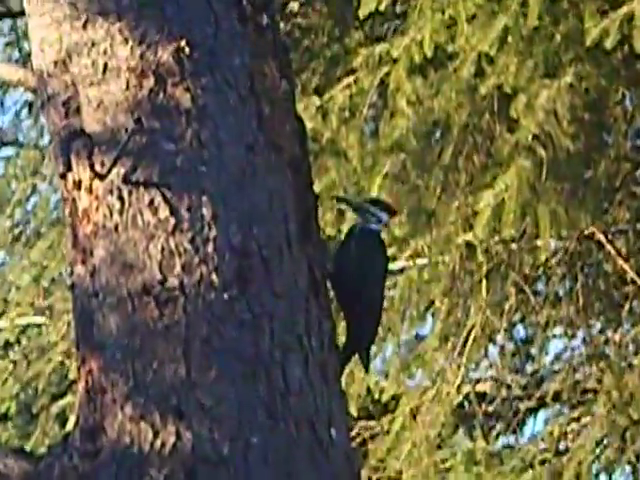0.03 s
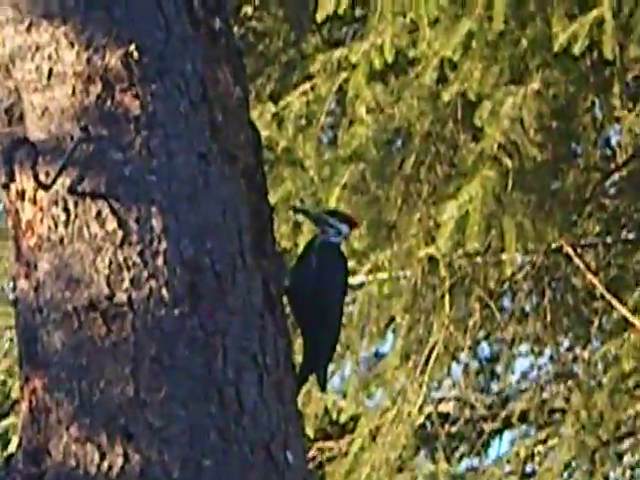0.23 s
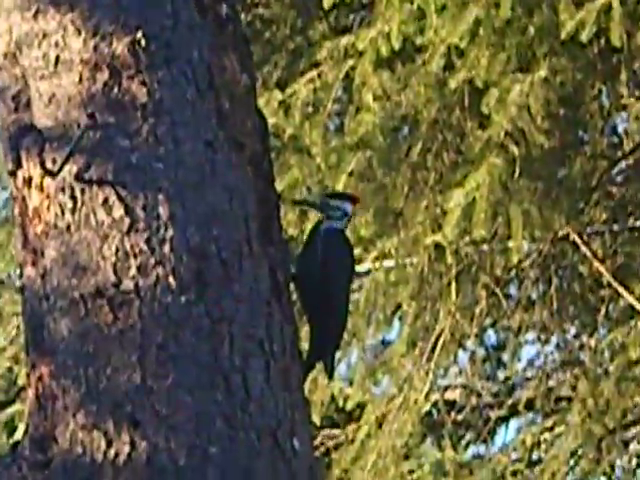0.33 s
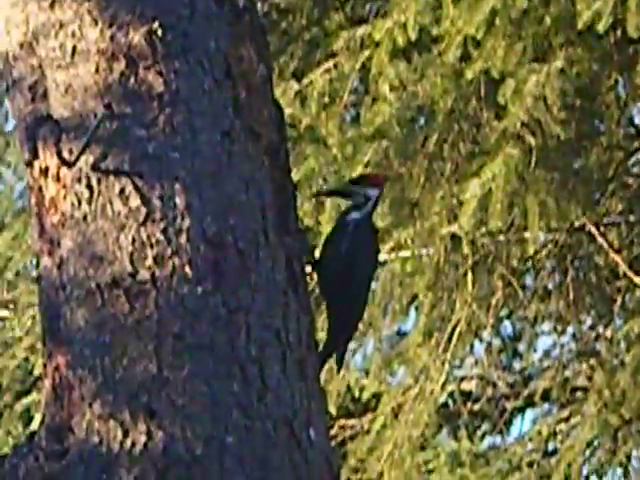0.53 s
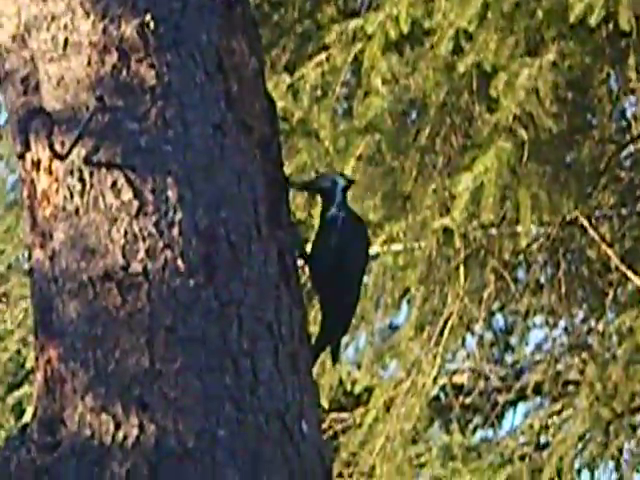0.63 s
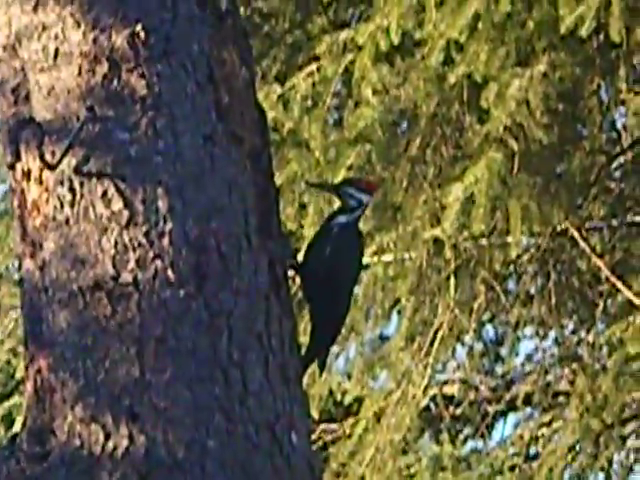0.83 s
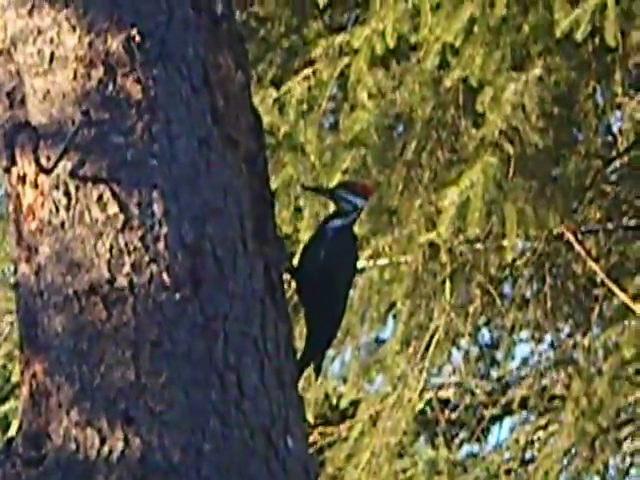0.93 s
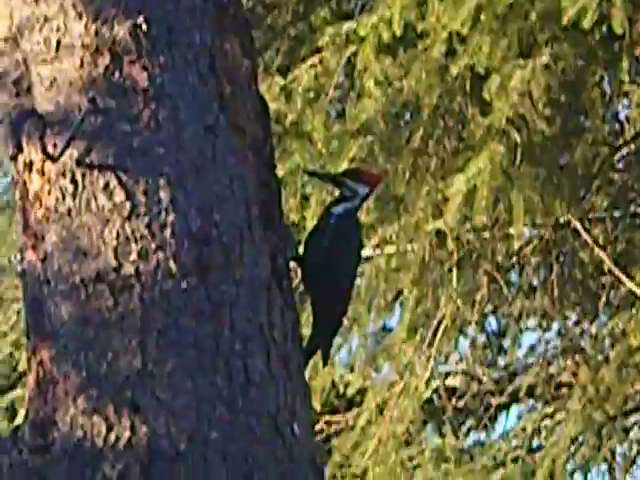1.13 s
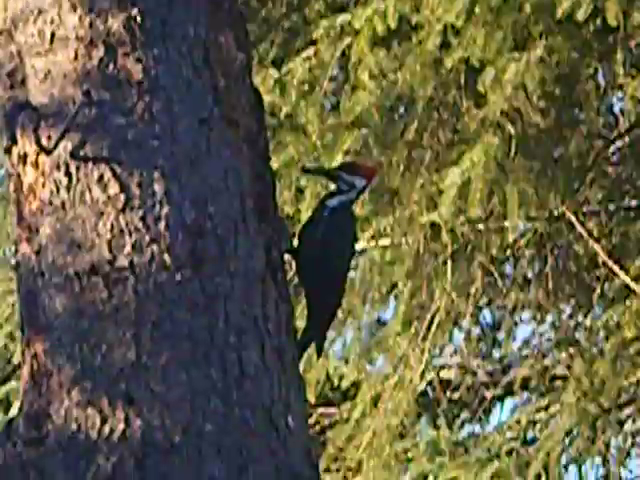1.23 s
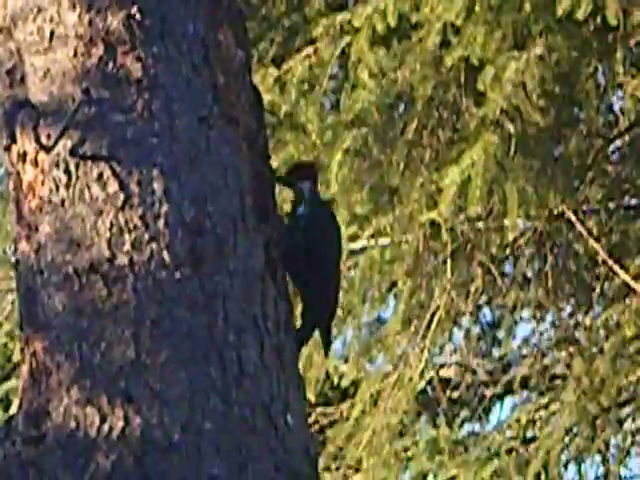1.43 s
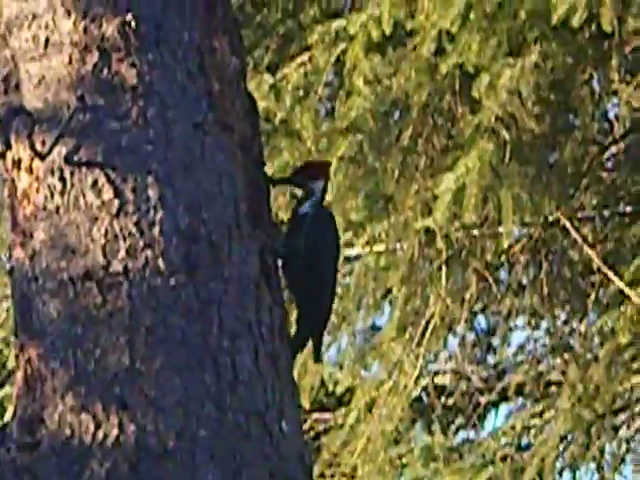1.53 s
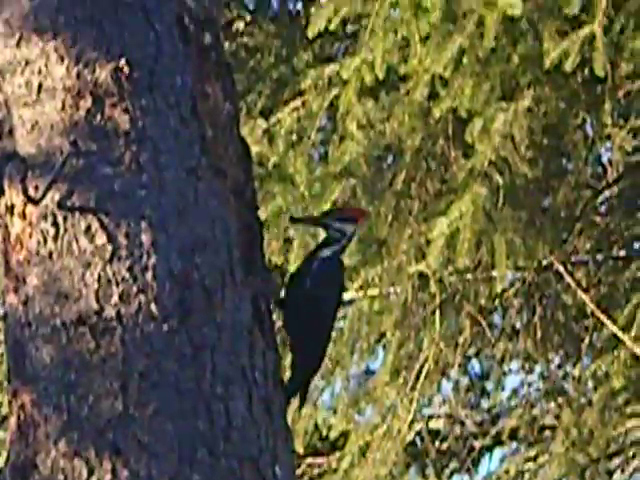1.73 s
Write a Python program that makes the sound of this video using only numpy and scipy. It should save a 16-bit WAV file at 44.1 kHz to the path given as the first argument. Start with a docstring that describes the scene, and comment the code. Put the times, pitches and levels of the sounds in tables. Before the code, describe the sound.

A woodpecker knocks once on a tree trunk over steady woodland hiss.

```python
"""A woodpecker's single knock

The woods hiss steadily and a distant engine drones at its firing rate, at first with a faint falling
whine, later with two fainter high tones. A woodpecker strikes a conifer trunk once: heavily damped
modes give a dry, dead knock that scatters briefly off nearby trees and just overloads the microphone.
Later its claws scratch faintly on the bark."""
import sys
import numpy as np
from scipy import signal
from scipy.fft import rfft, irfft, next_fast_len
from scipy.io import wavfile
from scipy.ndimage import map_coordinates

SR = 44100
rng = np.random.default_rng(int(sys.argv[2]) if len(sys.argv) > 2 else 0)


def transcribe(u):
    """Save the signal u as a 16-bit wav file named by the first command-line argument.

    u: samples, shape (n,) or (channels, n), limited to [-1, 1]; the rate is SR.
    q: integer samples, one column per channel.
    """
    v = np.clip(np.atleast_2d(u).T, -1, 1)
    q = np.round(v * 32767).astype(np.int16)
    wavfile.write(sys.argv[1], SR, q)


N = 79380


def amp(db):
    """Decibels to amplitude ratio."""
    return 10 ** (np.asarray(db) / 20)


def unit(x):
    """Normalisation to rms 1."""
    return x / np.sqrt(np.mean(x ** 2) + 1e-20)


def curves(rows):
    """Linear interpolation: one value per sample for each column after the time."""
    times, *columns = np.transpose(rows)
    return [np.interp(np.arange(N) / SR, times, column) for column in columns]


def since(onset):
    """Seconds since an onset, zero before it."""
    return np.maximum(np.arange(N) / SR - onset, 0)


def wobble(rate):
    """Smooth random modulation: a spline through `rate` knots a second."""
    return map_coordinates(rng.standard_normal(64), [np.arange(N) * rate / SR], mode="mirror")


def filtered(x, response):
    """Linear filtering: the spectrum of x times a frequency response."""
    size = next_fast_len(N + SR // 2)
    return irfft(rfft(x, size) * response(np.fft.rfftfreq(size, 1 / SR)), size)[:N]


def noise(spectrum):
    """Spectral shaping: noise of rms 1, coloured by (Hz, dB) points on a log frequency axis."""
    points_hz, db = np.transpose(spectrum)
    colour = lambda hz: amp(np.interp(np.log(hz + 1), np.log(points_hz), db))
    return unit(filtered(rng.standard_normal(N), colour))


def decay(t, t60):
    """Exponential damping: 60 dB in t60 seconds."""
    return np.exp(-np.log(1000) * t / t60)


# spectra of the hiss and the rumble (frequency [Hz], relative density [dB])
HISS_SPECTRUM = [(200, -6.5), (300, -1.5), (450, -3), (850, -2.5), (1200, -6.5), (1650, -8), (1830, -7.5),
                 (2000, -7.5), (2330, -8), (2550, -11), (3500, -12), (4100, -11), (5300, -14.5),
                 (6300, -10)]
RUMBLE_SPECTRUM = [(20, -8), (60, 0), (120, 9), (200, 4), (350, -16), (900, -59.5)]
# envelope of the hiss (time [s], level [dB])
HISS_ENVELOPE = [(0, -48.5), (.15, -48.5), (.28, -51), (.5, -51), (.68, -49.5), (1.0, -48.6), (1.2, -48),
                 (1.45, -49), (1.65, -48), (1.8, -48.5)]

def woods(low_hz=200, edge_hz=5410, flutter_db=1.0, flutter_rate=5.4, rumble_db=-60):
    """Band-limited noise: the woods hiss with slow amplitude modulation, over a faint rumble."""
    level_db, = curves(HISS_ENVELOPE)
    high_pass = lambda hz: hz ** 2 / np.sqrt(hz ** 4 + low_hz ** 4)
    band = lambda hz: high_pass(hz) / np.sqrt(1 + (hz / edge_hz) ** 64)
    hiss = unit(filtered(noise(HISS_SPECTRUM), band))
    hiss *= amp(level_db + flutter_db * wobble(flutter_rate))
    return hiss + amp(rumble_db) * noise(RUMBLE_SPECTRUM)


# engine's fundamental (time [s], firing rate [Hz], level [dB])
FIRING_TONE = [(0, 107.9, -54), (.07, 109.3, -42.5), (.15, 107.1, -57.5), (.24, 106.3, -49.5),
               (.33, 106.5, -50.5), (.41, 104.5, -58), (.55, 104.4, -46.5), (.74, 104.6, -50.5),
               (.98, 104.4, -46.5), (1.12, 103.9, -50.5), (1.26, 103, -59), (1.35, 103.5, -49.5),
               (1.6, 106.9, -47), (1.8, 106.2, -45.5)]
# swells of the drone (time [s], second harmonic level [dB], uneven lines' level [dB])
DRONE_SWELLS = [(0, -88, -57), (.12, -59.5, -50), (.32, -62, -60), (.44, -55.5, -57.5), (.57, -70, -57),
                (.75, -58, -56), (.92, -53, -55.5), (1.11, -64.5, -55.5), (1.26, -57.5, -51.5),
                (1.42, -54.5, -54), (1.6, -60.5, -56), (1.8, -64, -55)]
# higher harmonics (multiple of the firing rate, level [dB])
FIRING_HARMONICS = [(3, -65), (4, -62), (5, -64)]
# lines from unequal cylinders (multiple of the cycle rate, relative level [dB])
UNEVEN_LINES = [(5, -2), (6, -3.5), (7, -9.5)]

def engine(cylinders=4, waver_db=4.0, waver_rate=5, high_drift=0.47, low_drift=0.45):
    """Periodic firing gives a harmonic series, which wavers as it propagates through the woods."""
    firing_hz, level_db = curves(FIRING_TONE)
    octave_db, uneven_db = curves(DRONE_SWELLS)
    phase = 2 * np.pi * np.cumsum(firing_hz) / SR
    partial = lambda k, drift: np.cos(k * phase + drift * (k - 1) * wobble(waver_rate))
    upper = sum(amp(db + waver_db * wobble(waver_rate)) * partial(k, high_drift)
                for k, db in FIRING_HARMONICS)
    uneven = amp(uneven_db) * sum(amp(db) * partial(k / cylinders, low_drift) for k, db in UNEVEN_LINES)
    octave = amp(octave_db) * partial(2, low_drift)
    return np.sqrt(2) * (amp(level_db) * np.cos(phase) + octave + upper + uneven)


def thin_tone(pitch_hz, level_db, waver_hz=11, waver_db=3, waver_rate=34):
    """Random frequency and amplitude modulation make a sinusoid flicker."""
    phase = 2 * np.pi * np.cumsum(pitch_hz + waver_hz * wobble(waver_rate)) / SR
    return np.sqrt(2) * amp(level_db + waver_db * wobble(waver_rate)) * np.sin(phase)


# distant falling whine (time [s], frequency [Hz], level [dB])
WHINE_GLIDE = [(0, 912, -60), (.15, 892, -55.5), (.3, 882, -63), (.4, 858, -57), (.47, 850, -69)]
# pair of high tones (frequency [Hz]) and their envelope (time [s], level [dB])
PAIR_HZ = [1815, 1887]
PAIR_ENVELOPE = [(0, -75), (.7, -70), (.95, -66), (1.3, -66.5), (1.8, -61.5)]

def whine():
    """Frequency glide: one thin tone sinks and fades; later two higher ones creep in."""
    pair_db, = curves(PAIR_ENVELOPE)
    return thin_tone(*curves(WHINE_GLIDE)) + sum(thin_tone(hz, pair_db) for hz in PAIR_HZ)


PECK_S, PECK_DB = .200075, 1.0  # onset and gain of the blow
# modes of the trunk and its bark (frequency [Hz], relative level [dB], T60 [s])
TRUNK_MODES = [(400, -30, 0.074), (585, -25, 0.034), (716, 1, 0.0067), (957, 11.5, 0.0044),
               (1238, 15.5, 0.0046), (1404, -14, 0.024), (1778, -13.5, 0.013), (2148, 0, 0.0077),
               (3390, -11, 0.0048), (3650, -7, 0.00471), (4270, 3.5, 0.0033), (4780, 4.5, 0.0026)]

def peck(contact_s=0.0013, radiate_hz=531):
    """Impact excitation: the bill dents the trunk, whose heavily damped modes ring briefly."""
    t = since(PECK_S)
    ring = sum(amp(db) * decay(t, t60) * np.sin(2 * np.pi * hz * t) for hz, db, t60 in TRUNK_MODES)
    dent = -amp(PECK_DB) * (1 - np.exp(-t / contact_s))  # the bill sinks into the bark
    radiation = signal.butter(2, radiate_hz, "high", fs=SR)  # a small patch radiates little bass
    return signal.lfilter(*radiation, dent * ring)


# nearest reflection (delay [s], gain [dB])
REFLECTION = [(.00445, -25)]
# scatter from trunks and branches (frequency [Hz], relative density [dB])
SCATTER_SPECTRUM = [(260, -27.5), (360, -0.5), (550, -4.5), (950, -12.5), (1200, -11.5), (1380, -2.5),
                    (1650, -2), (1950, -9), (2500, -18.5), (4000, -34), (5500, -32), (7000, -80.5)]

def trees(knock, dull_hz=2500, scatter_db=-23, rise_s=0.00291, t60=0.035):
    """Reflection and scattering: the ground returns a dull copy of the knock, and nearby trees a diffuse tail."""
    delay = lambda hz: sum(amp(db) * np.exp(-2j * np.pi * hz * s) for s, db in REFLECTION)
    early = filtered(knock, lambda hz: delay(hz) / (1 + 1j * hz / dull_hz) ** 2)
    t = since(PECK_S)
    envelope = amp(PECK_DB + scatter_db) * (1 - np.exp(-t / rise_s)) * decay(t, t60)
    return early + envelope * noise(SCATTER_SPECTRUM)


# strokes of the claws (time [s], gain [dB], T60 [s])
CLAW_STROKES = [(1.5626, -28, .013), (1.5810, -37, 0.017)]
# scratching noise (frequency [Hz], relative density [dB])
CLAW_SPECTRUM = [(500, -13), (1200, 2), (2200, -1), (3200, -2), (4200, 0), (5400, 2), (5900, -7),
                 (6400, -73)]
# modes of a flake of bark (frequency [Hz], relative level [dB], T60 [s])
FLAKE_MODES = [(3322, -4.5, 0.019), (5260, -0.5, 0.0098)]

def claws(rise_s=.0014):
    """Friction and free vibration: as the bird shifts its grip, each scratch sets a flake ringing."""
    envelope = lambda t, t60: (1 - np.exp(-t / rise_s)) ** 2 * decay(t, t60)
    flake = lambda t: sum(amp(db) * envelope(t, t60) * np.sin(2 * np.pi * hz * t)
                          for hz, db, t60 in FLAKE_MODES)
    grit = noise(CLAW_SPECTRUM)
    return sum(amp(db) * (grit * envelope(since(onset), t60) + flake(since(onset)))
               for onset, db, t60 in CLAW_STROKES)


def scene():
    """Superposition: the bird and the background add in one channel."""
    knock = peck()
    return (knock + trees(knock) + claws() + engine() + whine() + woods())[None]


def record(dry, ceiling=0.7, hardness=5.1, top_hz=16500):
    """Saturation and band limiting: the microphone rounds off peaks; a steep low-pass follows."""
    clipped = dry[0] / (1 + np.abs(dry[0] / ceiling) ** hardness) ** (1 / hardness)
    return filtered(clipped, lambda hz: 1 / np.sqrt(1 + (hz / top_hz) ** 160))[None]


dry = scene()
out = record(dry)
transcribe(out)
```